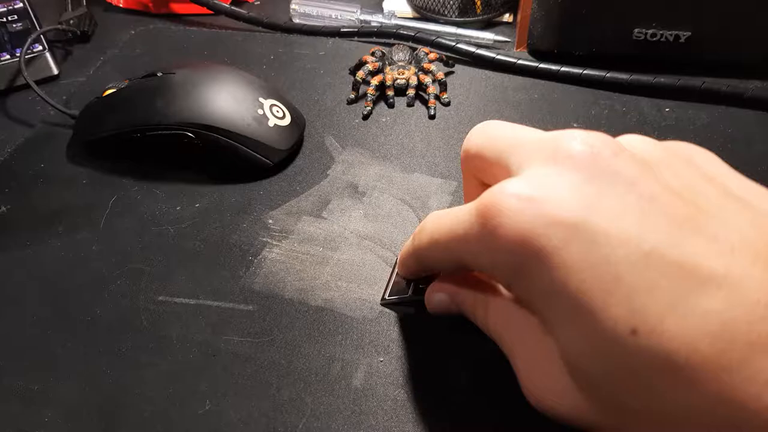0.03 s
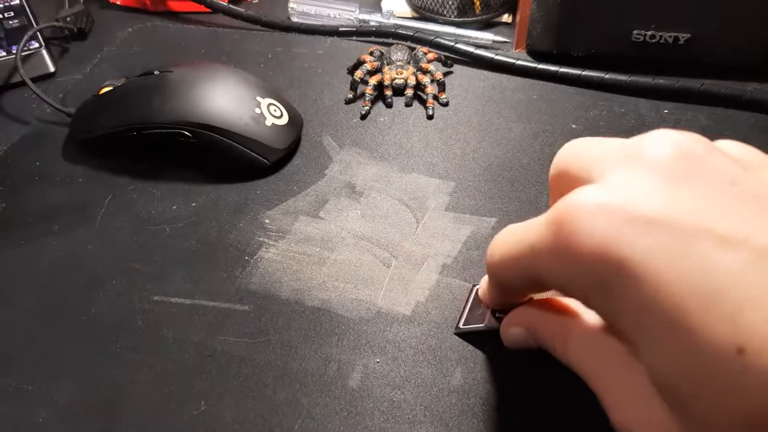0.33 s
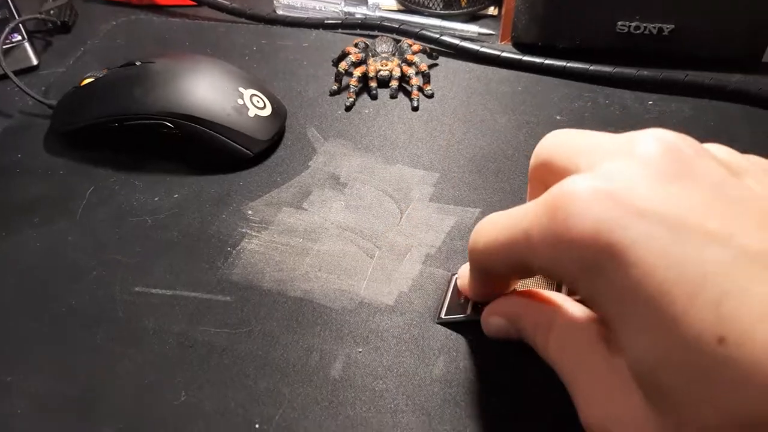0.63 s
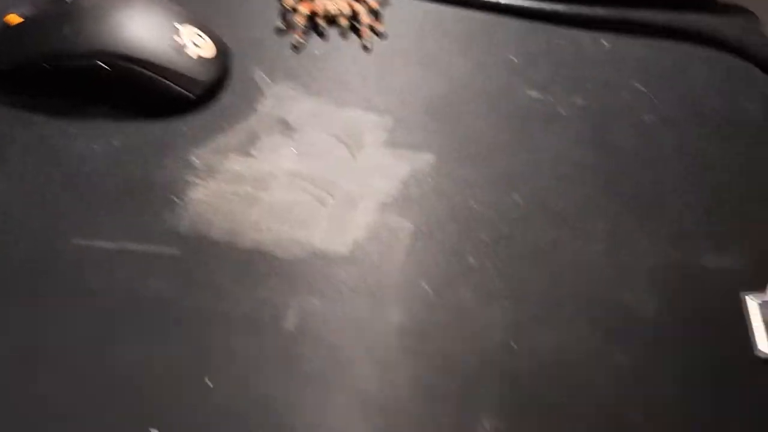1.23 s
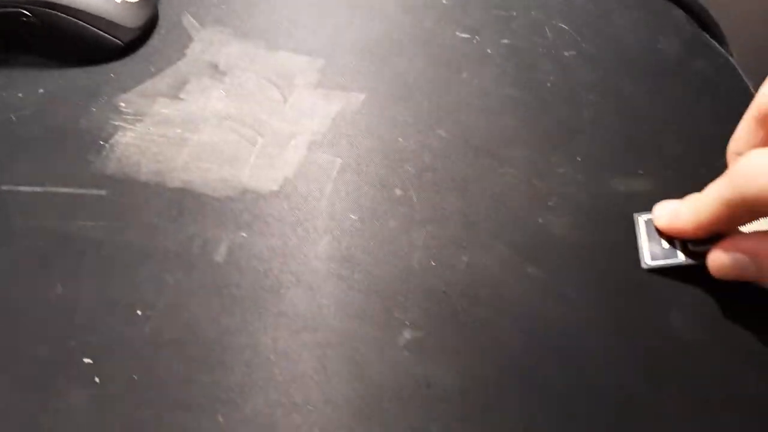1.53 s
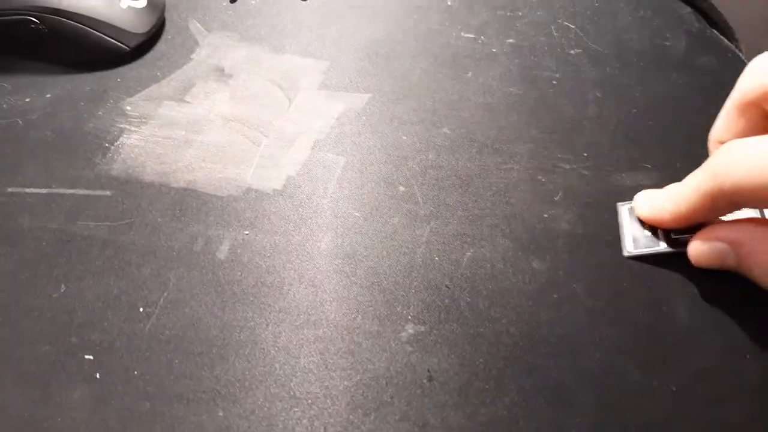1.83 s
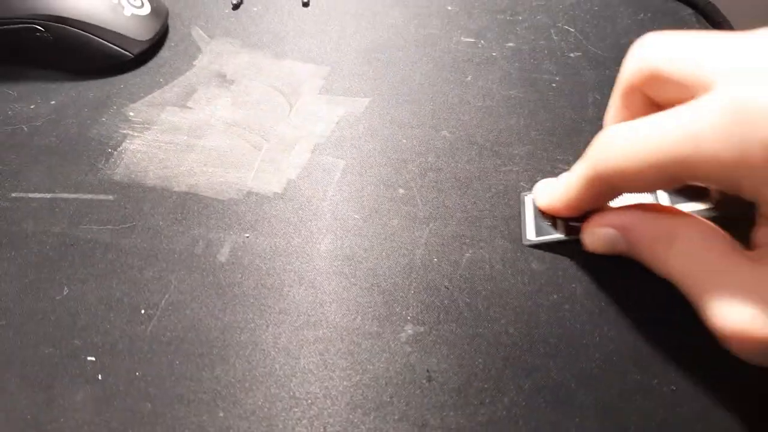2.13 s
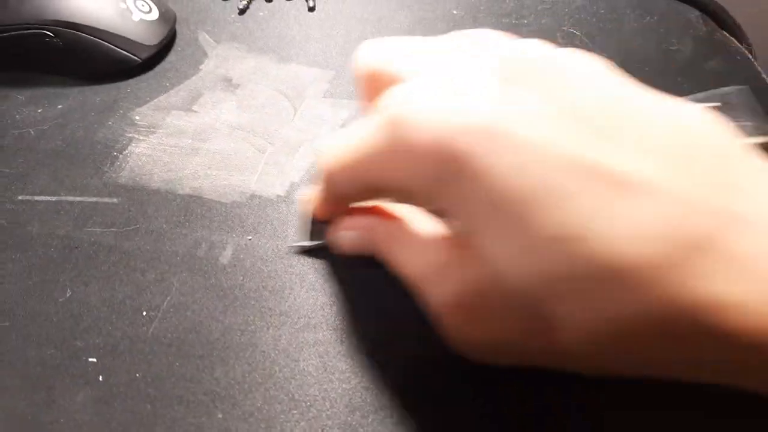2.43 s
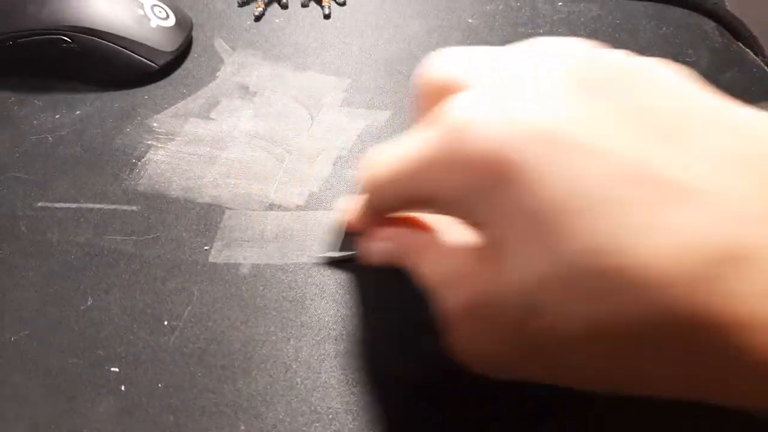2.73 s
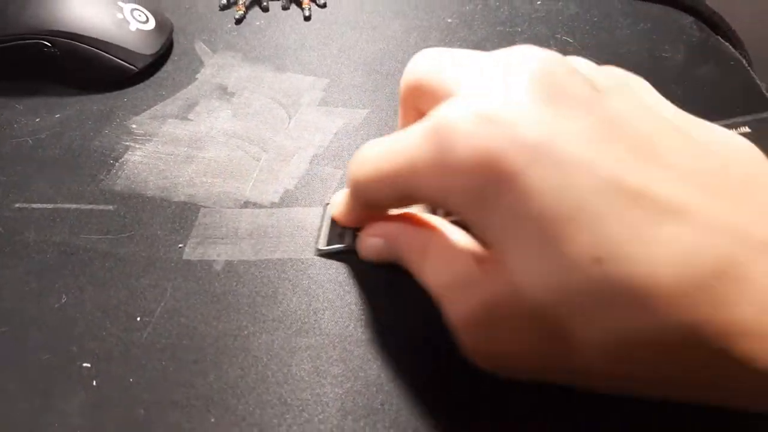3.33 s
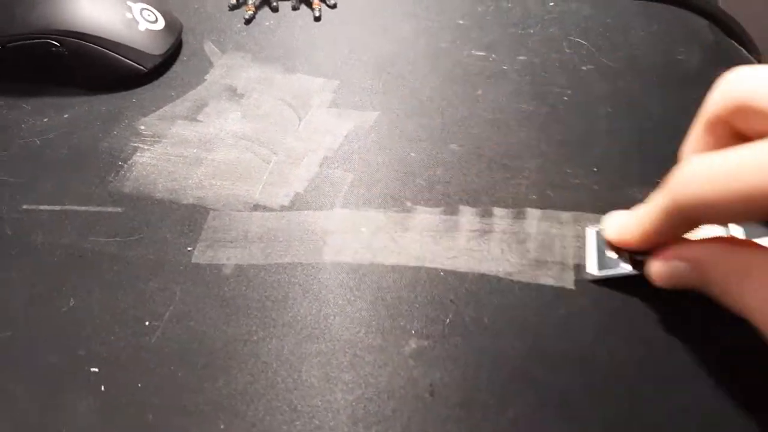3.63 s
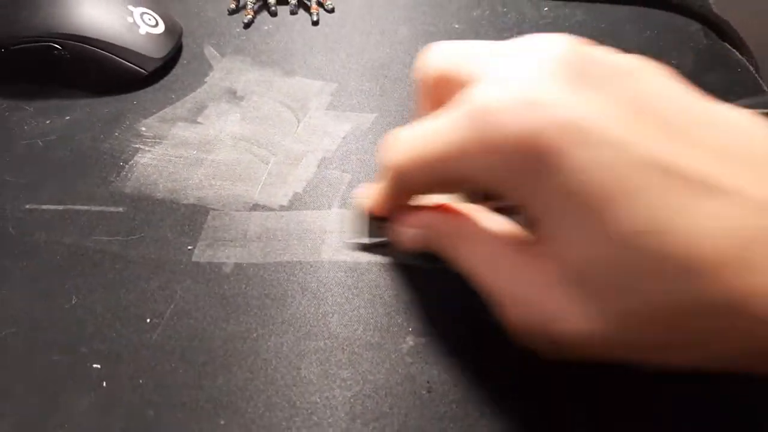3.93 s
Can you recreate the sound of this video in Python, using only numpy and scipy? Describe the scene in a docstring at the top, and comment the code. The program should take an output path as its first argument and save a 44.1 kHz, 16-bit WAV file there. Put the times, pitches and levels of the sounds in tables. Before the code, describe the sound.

A blade scrapes a dirty mouse pad close to the microphone in a quiet room. After a light brush and faint fan hiss, three gritty pushes judder and softly thump the desk, alternating with two lighter, hissing pulls.

```python
"""Scraping a dirty mouse pad

A hand-held blade is worked back and forth over a mouse pad on a desk, close to the microphone.
Pushes dig in, judder and thump the desk; pulls hiss lightly. The edge zips over ridges in the dirt.
A steady hiss, probably a fan, reaches the left side until the microphone turns with a soft rustle.
Once, something ticks against the microphone's left opening."""
import sys
import numpy as np
from scipy import signal
from scipy.fft import rfft, irfft, next_fast_len
from scipy.io import wavfile
from scipy.ndimage import map_coordinates

SR = 44100
rng = np.random.default_rng(int(sys.argv[2]) if len(sys.argv) > 2 else 0)


def file_out(sig):
    """Save sig as 16-bit WAV at sys.argv[1]."""
    # one column per channel
    cols = np.atleast_2d(sig).T
    # limit, then scale
    lim = np.clip(cols, -1, 1)
    pcm = np.round(lim * 32767).astype(np.int16)
    wavfile.write(sys.argv[1], SR, pcm)


N = 176400


# forward strokes: start_s, end_s, rise_s, fall_s, level_db, treble_db
PUSHES = [(1.66, 2.68, 0.8, 0.19, -41, -1.5), (3.083, 3.465, 0.083, 0.16, -41, -2),
          (3.735, 4.2, .16, 0.28, -41.5, 0)]
# tone of a push: pitch_hz, left_db, right_db
PUSH_TONE = [(30, -36, -24), (56.4, -5, -17), (106.5, -14, 6.5), (196, -11, -16), (308, -1.5, -2),
             (390, -7.5, -5.5), (700, -5.5, -5), (856, -7, -1.5), (1070, -6, 5), (1560, -9, -8),
             (2320, -8.5, -8), (2590, -14, -8), (3460, -9.5, -13), (4130, -18, -12.5), (4700, -44, -9),
             (5400, -25.5, -11.5), (6340, -38, -13), (7570, -63, -10), (8400, -69, -25.5),
             (9750, -45, -25.5), (12000, -29, -19.5), (15500, -44, -22.5)]
def pushes():
    """The blade digs in going forward, and gets quieter each time it sticks."""
    return strokes(PUSHES, PUSH_TONE) * amp(-sticking_db())


# moments when the blade sticks: time_s, slowing_s, depth_db
STALLS = [(1.88, 0.024, 11.5), (1.977, 0.023, 12.5), (2.084, 0.019, 12), (2.153, 0.012, 4),
          (2.205, 0.0088, 11), (2.274, 0.013, 12), (2.334, 0.017, 9)]
def sticking_db(slip_share=0.63):
    """How far the sound dips as the blade sticks; breaking free takes slip_share as long."""
    t = clock()
    dip_db = 0
    for when, slowing, depth_db in STALLS:
        width = slowing * np.where(t > when, slip_share, 1)
        dip_db += depth_db * np.exp(-((t - when) / width) ** 2)
    return dip_db


# times of hard pressing: start_s, end_s, rise_s, fall_s, level_db
DRAGS = [(1.72, 2.558, 0.22, 0.12, -49.5), (3.07, 3.45, 0.066, .13, -50.5), (3.734, 4.1, 0.042, .1, -56.5)]
# tone of the drag: pitch_hz, left_db, right_db
DRAG_TONE = [(30.2, -32, -41), (63, -36, -18), (107, -1.5, 8.5), (190, -14, -12.5), (310, -8.5, -9),
             (510, -17, -11), (740, -35, -22), (1140, -19, -15), (2000, -56, -26), (5000, -80, -78)]
def drag(dip_share=0.44):
    """The pressed blade drags on the pad and shakes the desk, less so while it sticks."""
    loudness = sum(motion(*row) for row in DRAGS) * amp(-dip_share * sticking_db())
    return loudness * stereo(rng.standard_normal((2, N)), DRAG_TONE)


# jumps of the blade: start_s, strength_db
JUMPS = [(1.81, -36), (1.897, -51), (1.927, -35.5), (1.964, -35), (1.996, -37), (2.059, -35), (2.10, -33),
         (2.139, -26.5), (2.195, -31), (2.275, -32), (2.334, -28.5), (3.141, -30.5), (3.19, -34),
         (3.276, -39), (3.872, -35.5)]
# the desk's own notes: pitch_hz, relative_db, ring_s
DESK_NOTES = [(99.4, -1.5, 0.091), (123.3, -3.5, 0.13), (305, -11, 0.091), (502, -13, .05)]
def thumps(rise_s=0.015, gain_db=8, left_db=-5):
    """Each jump of the blade makes the desk ring; the pad softens the blow."""
    out = np.zeros(N)
    for start, strength_db in JUMPS:
        swell = 1 - np.exp(-(np.maximum(clock() - start, 0) / rise_s) ** 2)
        for hz, note_db, ring_s in DESK_NOTES:
            gain = amp(strength_db + note_db + rng.normal(0, 2.5))
            out += gain * swell * ring(start, hz * (1 + rng.normal(0, 0.03)), ring_s)
    return out * amp(gain_db) * amp([[left_db], [0]])


# return strokes: start_s, end_s, rise_s, fall_s, level_db, treble_db
PULLS = [(2.635, 3.08, .26, 0.13, -47.5, -1), (3.42, 3.755, .18, 0.12, -48.5, -2)]
# tone of a pull: pitch_hz, left_db, right_db
PULL_TONE = [(30, -42, -50), (100, -7, 0.5), (198, -29, -21.5), (308, 2, 0), (390, -15, -15.5),
             (670, -14, -12.5), (1136, -12.5, 0), (1460, -14.5, -7), (2320, -7.5, -8.5), (2810, -14, -5.5),
             (3270, -9.5, -14), (4260, -16, -7.5), (4750, -33, -10), (5500, -29, -7.5), (6400, -35, -7),
             (7450, -52, -3.5), (8600, -50, -20.5), (9800, -43, -20.5), (11700, -20, -13),
             (15300, -41, -16)]
def pulls():
    """The blade slides back with a light hiss."""
    return strokes(PULLS, PULL_TONE)


# runs over ridges: start_s, length_s, first_hz, last_hz, level_db
ZIPS = [(2.092, 0.065, 592, 430, -36.5), (2.896, .12, 1252, 620, -45), (3.594, .095, 1390, 680, -44)]
def zips(bend=1.5, jitter=0.0351, left_db=-6):
    """Short, shaky tones that fall as ridges pass under the edge ever more slowly."""
    out = np.zeros(N)
    for start, length, first_hz, last_hz, db in ZIPS:
        progress = np.clip((clock() - start) / length, 0, 1)
        hz = (first_hz + (last_hz - first_hz) * progress ** bend) * (1 + jitter * wobble(300))
        loudness = amp(db + wobble(120)) * np.sin(np.pi * progress) ** 2
        out += loudness * np.sin(2 * np.pi * np.cumsum(hz) / SR)
    return out * amp([[left_db], [0]])


# light touches: start_s, end_s, rise_s, fall_s, level_db, treble_db
SCUFFS = [(.06, .43, 0.28, 0.19, -56, 0.5), (1.786, 1.85, .014, .05, -57.5, -11.5)]
# tone of a scuff: pitch_hz, left_db, right_db
SCUFF_TONE = [(100, -18, -13), (604, -11, -12.5), (1150, -3.5, 3.5), (1600, -7, -11.5), (2010, -5.5, -3),
              (2700, -9, -13.5), (3440, -10.5, -11.5), (4830, -26, -16.5), (5650, -18, -8.5),
              (6160, -24, -14), (7000, -32, -4), (7730, -40, -13), (8800, -42, -24.5), (12000, -21, -16.5),
              (15500, -34, -23)]
def scuffs():
    """The blade brushes the pad as it is set in place."""
    return strokes(SCUFFS, SCUFF_TONE)


def strokes(rows, tone, treble_hz=3030):
    """Rubbing swells and fades with each stroke, some brighter, some duller."""
    rub = friction(tone)
    treble = filtered(rub, lambda hz: hz ** 4 / (hz ** 4 + treble_hz ** 4))
    return sum(motion(*shape) * (rub + (amp(treble_db) - 1) * treble) for *shape, treble_db in rows)


def friction(tone, specks_per_s=3500, spread_db=4, grit_share=0.49, chatter_per_s=110, chatter_db=0.56):
    """Specks of dirt break loose over a smooth rub, which flutters as the edge chatters."""
    hits = rng.random((2, N)) < specks_per_s / SR
    specks = hits * rng.choice([-1, 1], (2, N)) * amp(spread_db * rng.standard_normal((2, N)))
    smooth = rng.standard_normal((2, N))
    force = np.sqrt(grit_share) * unit(specks) + np.sqrt(1 - grit_share) * smooth
    return unit(stereo(dirt_patches(force), tone) * amp(chatter_db * wobble(chatter_per_s)))


def dirt_patches(x, depth_db=2.16, patch_hz=169, patch_s=0.09):
    """The tone shifts at random as the edge meets new dirt."""
    hz, t, spectrum = signal.stft(x, SR, nperseg=1024)
    grid = np.meshgrid(hz / patch_hz, t / patch_s, indexing="ij")
    patches = map_coordinates(rng.standard_normal((400, 400)), grid, mode="wrap")
    return signal.istft(spectrum * amp(depth_db * patches), SR, nperseg=1024)[1][:, :N]


def motion(start, end, rise, fall, db, speed_power=2.136):
    """A movement speeds up and slows down; faster is louder."""
    ease = lambda u: np.sin(np.pi / 2 * np.clip(u, 0, 1))
    speed = ease((clock() - start) / rise) * ease((end - clock()) / fall)
    return amp(db) * speed ** speed_power


def tick(gain_db=1.5, band_hz=(336, 3000)):
    """Something taps the microphone's left opening: one dull, dead tick."""
    band = signal.butter(2, band_hz, btype="band", fs=SR, output="sos")
    tap = signal.sosfilt(band, ring(start=2.5926, hz=1590, ring_s=0.0014))
    return amp(gain_db) * np.array([tap, np.zeros(N)])


# small movements: start_s, end_s, rise_s, fall_s, level_db, pitch_hz
RUSTLES = [(.6, 1.356, 0.28, 0.27, -67.5, 414), (1.2, 1.522, .1, 0.13, -65.5, 94)]
def rustles(width_octaves=0.55, left_db=-3):
    """Soft, dull noise as the hand and microphone move."""
    out = np.zeros(N)
    for *shape, pitch_hz in RUSTLES:
        band = lambda hz: np.exp(-0.5 * (np.log2((hz + 1) / pitch_hz) / width_octaves) ** 2)
        out += motion(*shape) * unit(filtered(rng.standard_normal(N), band))
    return out * amp([[left_db], [0]])


# tone of the fan: pitch_hz, relative_db
FAN_TONE = [(200, -21), (320, -13), (650, -14), (900, -2), (1500, -1.5), (2250, 5.5), (2700, -2.5),
            (3400, -9), (4750, -13.5), (6400, -19), (7400, -35), (8600, -46), (12000, -24.5), (15500, -39)]
# its loudness on the left: time_s, level_db
FAN_LEVEL = [(.1, -57), (.6, -56), (1.15, -55.5), (1.31, -61), (1.38, -73), (1.5, -79)]
def fan(right_db=-26):
    """A fan's hiss on the left fades as the microphone turns away."""
    hiss = unit(filtered(rng.standard_normal((2, N)), lambda hz: amp(along(FAN_TONE, hz))))
    return hiss * wavering(FAN_LEVEL, waver_db=1) * amp([[0], [right_db]])


# tone of the room: pitch_hz, left_db, right_db
ROOM_TONE = [(30, -28, -26), (60.4, -8, -5.5), (103.6, -3.5, 8.5), (196, -11, -9.5), (311, 9, 8),
             (374, -8.5, -7.5), (530, -1.5, -1.5), (650, -14.5, -19), (1090, -9, -18), (1700, -5.5, -22),
             (2220, -1, -30), (3170, -21.5, -26.5), (6100, -27, -26.5), (9050, -38, -33.5),
             (12000, -26.5, -28), (15500, -30, -28)]
# its loudness: time_s, level_db
ROOM_LEVEL = [(.1, -69.5), (.6, -66), (1.38, -64), (1.52, -69), (1.7, -66.5), (2, -64.5), (4, -65)]
def room_noise():
    """The room's faint, low murmur."""
    return wavering(ROOM_LEVEL, waver_db=2.75) * stereo(rng.standard_normal((2, N)), ROOM_TONE)


def room_echo(x, ring_s=0.18, level_db=-20.5):
    """Sound bounces briefly around a small furnished room."""
    t = np.arange(SR // 3) / SR
    tail = rng.standard_normal((2, len(t))) * np.exp(-np.log(1000) * t / ring_s)
    return amp(level_db) * signal.fftconvolve(x, tail / np.linalg.norm(tail[0]), axes=1)[:, :N]


# how alike left and right are: pitch_hz, likeness (0 to 1)
LIKENESS = [(100, 1), (500, 0.83), (1100, 0.62), (2000, .5), (3000, 0.083), (10000, 0.11)]
def stereo(pair, tone):
    """Blend two noises into left and right: alike in the bass, each with its own tone."""
    angle = lambda hz: np.arccos(np.clip(along(LIKENESS, hz)[0], 0, 1)) / 2
    mid, side = filtered(pair, lambda hz: np.array([np.cos(angle(hz)), np.sin(angle(hz))]))
    return unit(filtered(np.array([mid + side, mid - side]), lambda hz: amp(along(tone, hz))))


def ring(start, hz, ring_s):
    """A pure note that fades by 60 dB in ring_s."""
    age = np.maximum(clock() - start, 0)
    return np.sin(2 * np.pi * hz * age) * np.exp(-np.log(1000) * age / ring_s)


def wavering(levels, waver_db):
    """Loudness that follows a table and wanders a little."""
    return amp(np.interp(clock(), *np.transpose(levels)) + waver_db * wobble(6.8))


def wobble(per_s):
    """A smooth curve through per_s random points a second."""
    return map_coordinates(rng.standard_normal(int(N * per_s / SR) + 4), [clock() * per_s])


def filtered(x, response):
    """Multiply each frequency in x by response(hz)."""
    size = next_fast_len(N + SR // 2)
    return irfft(rfft(x, size) * response(np.fft.rfftfreq(size, 1 / SR)), size)[..., :N]


def along(table, hz):
    """Read a table's columns between its listed pitches."""
    pitches, *columns = np.transpose(table)
    return np.array([np.interp(np.log(hz + 1), np.log(pitches + 1), c) for c in columns])


def amp(db):
    """Turn decibels into a multiplier."""
    return 10 ** (np.asarray(db) / 20)


def unit(x):
    """Scale to an average strength (rms) of 1."""
    return x / np.sqrt(np.mean(x ** 2) + 1e-20)


def clock():
    """The time of every sample, in seconds."""
    return np.arange(N) / SR


# how far the blade's wave is ahead on the left (negative is late): pitch_hz, lead_radians
LEFT_LEAD = [(30, -3.5), (100, .5), (270, 0), (500, -2.5), (900, -1.5), (1200, -1.4), (1500, -3.5),
             (2100, -3.5), (4000, -7.5)]
def scene():
    """Mix everything. The blade works on the right, so most of its sound reaches the left late."""
    blade = pushes() + drag() + pulls() + scuffs() + zips()
    blade = filtered(blade, lambda hz: np.exp(1j * along(LEFT_LEAD, hz) * np.array([[1], [0]])))
    return blade + room_echo(blade) + thumps() + tick() + rustles() + room_noise() + fan()


def record(dry, start_s=0.105, fade_s=0.0023, top_hz=15800):
    """The sound begins after a moment of silence and holds nothing above top_hz."""
    fade_in = np.clip((clock() - start_s) / fade_s, 0, 1)
    return filtered(dry * fade_in, lambda hz: hz < top_hz)


dry = scene()
out = record(dry)
file_out(out)
```